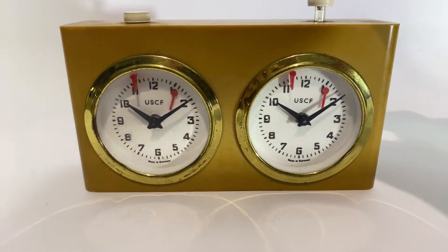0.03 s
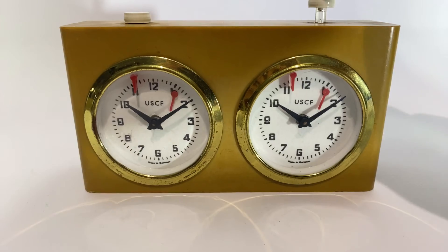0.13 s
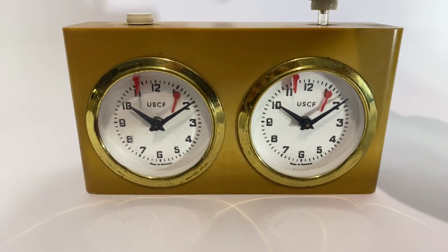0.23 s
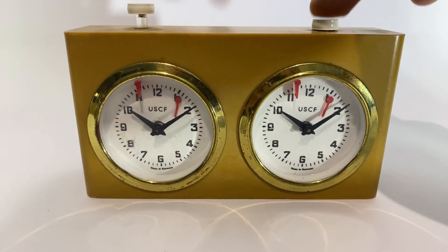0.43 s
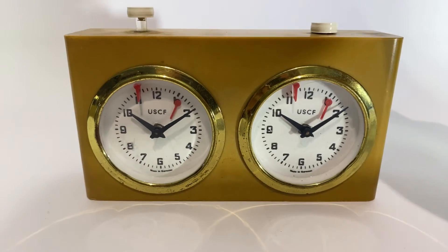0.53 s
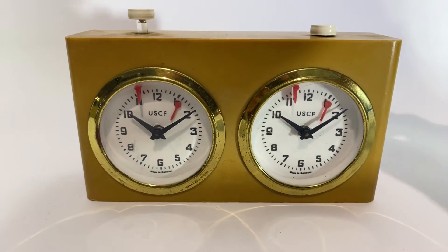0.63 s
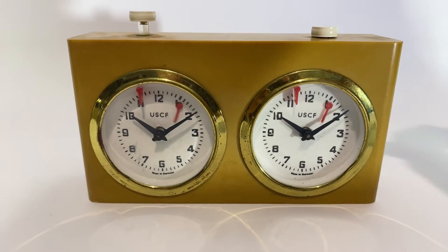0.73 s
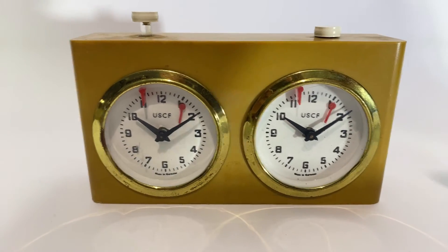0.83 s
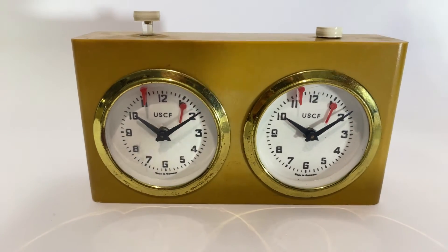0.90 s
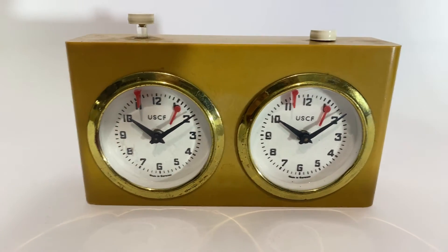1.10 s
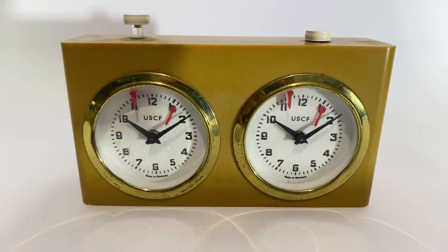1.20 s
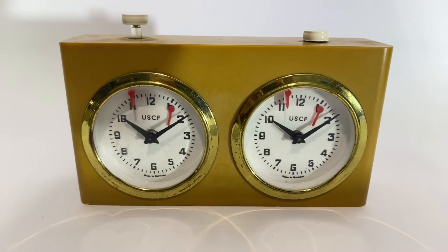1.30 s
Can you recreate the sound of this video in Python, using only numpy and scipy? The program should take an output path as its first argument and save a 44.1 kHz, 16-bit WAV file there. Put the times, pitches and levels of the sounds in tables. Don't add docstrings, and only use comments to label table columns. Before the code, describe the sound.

A sharp plastic-and-metal clack of a chess clock lever, amid faint quick ticking in a quiet room

```python
import sys
import numpy as np
from scipy import signal
from scipy.fft import rfft, irfft
from scipy.io import wavfile
from scipy.ndimage import uniform_filter1d

SR = 44100
rng = np.random.default_rng(int(sys.argv[2]) if len(sys.argv) > 2 else 0)


def put_to_file(sound):
    columns = np.atleast_2d(sound).T
    safe = np.clip(columns, -1, 1)
    whole_steps = np.round(safe * 32767)
    wavfile.write(sys.argv[1], SR, whole_steps.astype(np.int16))


def to_linear_factor(level_db):
    exponent = np.asarray(level_db, float) / 20
    return 10 ** exponent


N = 59535

# pitch_hz [Hz], density_db [dB per Hz]
ROOM_SPECTRUM = [(30, -5.5), (62, 3), (130, -3.5), (700, -13), (1500, -19), (3500, -23.5), (6500, -23.5),
                 (15500, -38)]
# pitch_hz [Hz], level_db [dB], t60_s [s]
HOLLOW_MODES = [(154, -13, 0.061), (210, -2.5, 0.19), (274, -5, 0.063), (286, 1, 0.074), (324, -3.5, 0.35),
                (460, -12, 0.11), (615, -13, 0.061)]
# pitch_hz [Hz], level_db [dB], t60_s [s]
PANEL_MODES = [(785, -5, 0.066), (994.6, -8, 0.13), (1123, -7, 0.11), (1255, -7.5, 0.062),
               (1405, -1.5, 0.077), (1476, 0, .04), (1520, -1.5, 0.042), (1725, 2, 0.031),
               (2035, 0.5, 0.022), (2350, -3, 0.047), (2676, -7, 0.056), (3050, -7, 0.021),
               (3540, -15, 0.065), (3725, -9.5, 0.046)]
# pitch_hz [Hz], level_db [dB], t60_s [s]
METAL_MODES = [(4100, -2, 0.025), (5224, 0, 0.017), (5340, -4, 0.023), (5630, 6, 0.022), (6555, 4.5, 0.027),
               (7050, 8, 0.013), (7630, -1.5, 0.012), (8700, -11, 0.018), (9580, -13, 0.045),
               (10750, -16, 0.025), (11700, -17, 0.012), (12700, -27, 0.015), (14600, -24.5, 0.014)]
# pitch_hz [Hz], level_db [dB], t60_s [s]
WORKS_MODES = [(951, -3, 0.1), (1410, -10, 0.11), (1499, -0.5, 0.12), (1730, -4.5, 0.053),
               (2264, -8.5, 0.083), (2480, -4.5, 0.041), (2673, -4, 0.033), (2967, -7, 0.036),
               (3420, -23.5, 0.042)]
# pitch_hz [Hz], level_db [dB], t60_s [s]
WOOD_MODES = [(554, -8, 0.11), (645, -1, 0.098), (856, -0.5, 0.046), (1160, -1.5, 0.067),
              (1506, -2.5, 0.028), (1580, -7.5, 0.13), (1810, -6, 0.054), (2120, 2, 0.052),
              (2440, -4.5, 0.052), (2790, -8, 0.077), (3078, -12.5, 0.058), (3380, -25, 0.043),
              (6200, -5.5, 0.01)]
# start_s [s], works_db [dB], works_tilt_db [dB per octave],
# metal_db [dB], metal_tilt_db [dB per octave]
TICKS = [(0.061, -64.5, -1.5, -95, .1), (0.0676, -65, 47, -62.5, -6), (0.0685, -75, 8, -86, -5),
         (0.438, -73, 2, -68, .1), (0.461, -59.5, 10, -90, -16), (0.47, -61, -7, -55.5, 15),
         (0.6866, -65.5, 5, -70, 10), (.706, -73, 12, -66, -11), (0.7131, -65, 1, -62.5, 29),
         (0.726, -62, 4, -75, 0), (0.9312, -68, 6, -64, -10), (0.957, -64, 18, -69, -7),
         (0.9622, -55.5, 5, -52.5, 7), (1.179, -66.5, 2.5, -65.5, 16), (1.2045, -62.5, 8.5, -62.5, 26),
         (1.219, -66, 5, -65, -9), (1.2504, -73, 6, -98, 3)]
# start_s [s], level_db [dB], pitch_hz [Hz], t60_s [s]
PINGS = [(0.0666, -64.5, 10750, 0.043), (0.0675, -55, 1487, 0.072), (0.257, -47, 335.2, 0.31),
         (0.213, -42.5, 264, 0.063), (0.2355, -37, 1389, 0.12), (0.2429, -41, 1476, 0.086),
         (0.236, -47, 1725, 0.1), (.214, -51, 3700, 0.13), (.219, -50, 2930, .04), (.6, -57, 837, .05),
         (1.206, -65, 1500, 0.11), (1.206, -67, 4100, 0.055), (0.962, -60, 4100, 0.05),
         (.258, -49, 172.6, 0.28), (.376, -57, 766, 0.038), (.376, -61, 1030, .07),
         (0.382, -55.5, 1486, 0.067), (.386, -62, 1940, 0.045), (.389, -51, 487, 0.069),
         (.398, -55, 550, 0.067), (.408, -58.5, 339.7, 0.34), (0.439, -60.5, 1730, 0.062),
         (0.439, -60.5, 2980, .04), (0.468, -64, 10100, 0.056), (.612, -59.5, 337, 0.3),
         (0.931, -68, 11900, 0.018), (0.9628, -51.5, 1410, 0.07), (1.206, -58, 11700, 0.014)]
# start_s [s], level_db [dB], pitch_hz [Hz], length_s [s]
RUBS = [(0.168, -63, 1110, 0.016), (.171, -59.5, 305, 0.058), (0.182, -62.5, 990, 0.018),
        (0.211, -51.5, 3430, 0.039), (0.21, -71, 14400, .02), (0.228, -70, 14700, 0.018),
        (0.237, -73, 14500, 0.019), (0.231, -61, 6950, 0.025), (0.241, -60, 7200, 0.026),
        (0.352, -65, 980, 0.012), (0.365, -59, 380, 0.029), (0.37, -62.5, 850, 0.014),
        (.379, -58.5, 930, 0.01), (.387, -66.5, 5200, 0.0054), (.390, -60, 487, 0.015),
        (0.264, -60.5, 646, 0.053), (0.597, -68.5, 6200, 0.013)]
# start_s [s], hollow_db [dB], panel_db [dB], metal_db [dB], contact_s [s]
BLOWS = [(0.2125, -45, -47.5, -63, 0.0016), (0.2166, -37, -39, -47.5, 0.0019),
         (.2205, -44, -48.5, -50, 0.0023), (0.2241, -55, -38.5, -56, 0.0035),
         (0.2348, -42.5, -34.5, -42.5, 0.0026), (0.2404, -43, -34.5, -39.5, 0.0017),
         (0.2423, -52, -35, -61, 0.00246), (0.246, -51, -38.5, -56, 0.0035),
         (0.2560, -55, -42, -43.5, 0.0025), (.2590, -50, -46.5, -60, 0.0027),
         (0.2640, -52, -45.5, -54, 0.0015)]
# start_s [s], level_db [dB], pitch_hz [Hz]
BUMPS = [
    (0.214, -42.5, 95),
    (0.247, -37.5, 69.4),
    (0.415, -49.5, 94),
    (0.546, -48, 79.6),
]
# time_s [s], level_db [dB], pitch_hz of the lower band [Hz]
SLIDE_PATH = [
    (0.388, -85, 3803),
    (0.422, -76.5, 3730),
    (0.457, -68, 4100),
    (0.487, -67, 3230),
    (0.552, -73, 3205),
    (0.589, -80, 3300),
]
# pitch_hz [Hz], width_hz [Hz], level_db [dB], centre_s [s], spread_s [s]
SLIDE_BANDS = [
    (5200, 700, 6, 0.43, 0.019),
    (4800, 1700, -5.5, 0.545, 0.1),
    (10200, 2600, -3.5, 0.575, 0.09),
]
# start_s [s], level_db [dB], tilt_db [dB per octave],
# spot_hz, the mode favoured by the struck spot [Hz], hold_s until damped [s]
KNOCKS = [
    (0.5990, -50.5, -1, 2120, 0.015),
    (.6032, -50.5, 0.5, 2440, 0.0087),
    (.6075, -54.5, -3, 645, .008),
    (0.8402, -56.5, -2, 856, 0.0086),
    (.8465, -62.5, -1, 1580, 0.0055),
    (1.0766, -62, -4, 554, 0.014),
    (1.3170, -59.5, -3.5, 1160, 0.011),
]

ROOM_DB, SWELL_DB, FLICKER_DB, CALM_ABOVE_HZ = -64.5, 1.5, 1, 3300
SCATTER_DB, DETUNE, CLUSTER, CLUSTER_DB = 2.5, 0.004, 0.05, -7.5
TICK_CONTACT_S = 0.0074
RUB_WIDTH, RUB_WIDEST_HZ = 0.99, 2420
HOLLOW_LOW_HZ = 153
BUMP_T60_S = 0.045
SLIDE_WIDTH_HZ = 850
KNOCK_LOW_HZ, KNOCK_TOP_HZ = 480, 3770
KNOCK_SPOT_DB, KNOCK_CONTACT_S, KNOCK_DAMP_S = 4, 0.0012, 0.002
ECHO_DB, KNOCK_ROOM_DB = -16, -7
ECHO_T60_S, ECHO_HIGH_T60_S = 0.21, 0.26
ECHO_SPLIT_HZ, ECHO_LOW_HZ, ECHO_EVEN_HZ = 3100, 374, 58.7
MIC_LOW_HZ, TOP_STEP_HZ, TOP_STEP_DB = 58, 15350, -14


def band(x, hz, width_hz):
    b, a = signal.iirpeak(hz, hz / width_hz, fs=SR)
    return signal.lfilter(b, a, signal.lfilter(b, a, x))


def unit(x):
    return x / np.sqrt(np.mean(x ** 2))


def walk(rate):
    hold = int(SR / rate)
    levels = np.repeat(rng.standard_normal(N // hold + 1), hold)
    return 1.2 * uniform_filter1d(levels, hold)[:N]


def add(out, start_s, x):
    i = int(start_s * SR)
    out[i:i + len(x)] += x[:N - i]


def scrape(contact_s):
    t = np.arange(1024) / SR
    decay = np.exp(-t / max(contact_s, 2e-4) * 2)
    return rng.standard_normal(len(t)) * decay * np.clip(t / 0.0003, 0, 1)


def ring(modes, push, tilt_db=0.):
    hz, db, t60 = np.tile(np.array(modes, float), (3, 1)).T[:, :, None]
    main = (np.arange(len(hz)) < len(modes))[:, None]
    chance = rng.standard_normal((2, len(hz), 1))
    hz = np.minimum(hz * (1 + np.where(main, DETUNE, CLUSTER) * chance[1]), SR * 0.45)
    t = np.arange(int(min(t60.max() + 0.025, 0.25) * SR)) / SR
    reach = np.abs(np.exp(2j * np.pi * hz * t[:len(push)]) @ push)[:, None]
    level_db = db + np.where(main, 0, CLUSTER_DB) + SCATTER_DB * chance[0]
    gain = to_linear_factor(level_db + tilt_db * np.log2(hz / 1000))
    gain = gain / (reach + 0.39 * np.sqrt(np.sum(push ** 2)))
    envelope = np.exp(-np.log(1000) * t / t60) * (1 - np.exp(-t * hz * 2))
    wave = gain * np.sin(2 * np.pi * hz * t) * envelope
    out = signal.fftconvolve(wave.sum(axis=0), push)
    return out / np.abs(out).max()


def room_tone():
    f = np.fft.rfftfreq(N, 1 / SR) + 1
    swell = walk(2.5)
    hz, density_db = np.array(ROOM_SPECTRUM).T
    white = rfft(rng.standard_normal(N)) * to_linear_factor(np.interp(np.log(f), np.log(hz), density_db))
    out = np.zeros(N)
    for octave in np.arange(4, 15):
        share = np.clip(1 - np.abs(np.log2(f) - octave), 0, 1)
        calm = min(1, CALM_ABOVE_HZ / 2. ** octave) ** 0.5
        motion_db = (SWELL_DB * swell + FLICKER_DB * walk(11.63)) * calm
        out = out + irfft(white * share, N) * to_linear_factor(motion_db)
    return to_linear_factor(ROOM_DB) * unit(out)


def escapement():
    out = np.zeros(N)
    for start_s, works_db, works_tilt_db, metal_db, metal_tilt_db in TICKS:
        push = scrape(TICK_CONTACT_S)
        add(out, start_s, to_linear_factor(works_db + 10.5) * ring(WORKS_MODES, push, works_tilt_db))
        add(out, start_s, to_linear_factor(metal_db + 6.5) * ring(METAL_MODES, push, metal_tilt_db))
    return out


def pings():
    out, t = np.zeros(N), np.arange(SR // 4) / SR
    for start_s, level_db, hz, t60 in PINGS:
        decay = to_linear_factor(level_db - 60 * t / t60)
        add(out, start_s, decay * np.sin(2 * np.pi * hz * t) * np.clip(t / 0.00036, 0, 1))
    return out


def rubs():
    out, t = np.zeros(N), np.arange(4096) / SR
    for start_s, level_db, hz, length_s in RUBS:
        shape = t / length_s * np.exp(1 - 3 * t / length_s) * 3
        width_hz = min(RUB_WIDTH * hz, RUB_WIDEST_HZ)
        noise = unit(band(rng.standard_normal(len(t)), hz, width_hz))
        add(out, start_s, to_linear_factor(level_db) * shape * noise)
    return out


def lever():
    out = np.zeros(N)
    for start_s, hollow_db, panel_db, metal_db, contact_s in BLOWS:
        push = scrape(contact_s)
        for modes, db in ((HOLLOW_MODES, hollow_db), (PANEL_MODES, panel_db), (METAL_MODES, metal_db)):
            add(out, start_s, to_linear_factor(db + 6.5) * ring(modes, push))
    return signal.sosfilt(signal.butter(3, HOLLOW_LOW_HZ, "high", fs=SR, output="sos"), out)


def table_bumps():
    out, t = np.zeros(N), np.arange(SR // 5) / SR
    for start_s, level_db, hz in BUMPS:
        decay = np.exp(-np.log(1000) * t / BUMP_T60_S)
        add(out, start_s, to_linear_factor(level_db) * np.sin(2 * np.pi * hz * t) * decay)
    return out


def finger_slide():
    t = np.arange(N) / SR
    time_s, level_db, hz = np.array(SLIDE_PATH).T
    phase = 2 * np.pi * np.cumsum(np.interp(t, time_s, hz)) / SR
    lowpass = signal.butter(2, SLIDE_WIDTH_HZ / 2, fs=SR)
    a, b = signal.lfilter(*lowpass, rng.standard_normal((2, N)))
    hiss = unit(a * np.cos(phase) + b * np.sin(phase))
    for band_hz, width_hz, band_db, centre_s, spread_s in SLIDE_BANDS:
        swell = np.exp(-((t - centre_s) / spread_s) ** 2)
        hiss = hiss + to_linear_factor(band_db) * swell * unit(band(rng.standard_normal(N), band_hz, width_hz))
    return hiss * to_linear_factor(np.interp(t, time_s, level_db, -120, -120) + 0.93 * walk(60.3))


def knocks():
    out = np.zeros(N)
    for start_s, level_db, tilt_db, spot_hz, hold_s in KNOCKS:
        modes = []
        for hz, mode_db, t60 in WOOD_MODES:
            favour_db = KNOCK_SPOT_DB * np.exp(-(np.log(hz / spot_hz) / 0.05) ** 2)
            modes.append((hz, mode_db + favour_db, t60))
        wood = ring(modes, scrape(KNOCK_CONTACT_S), tilt_db)
        late = np.maximum(np.arange(len(wood)) / SR - hold_s, 0)
        add(out, start_s, to_linear_factor(level_db + 11.0) * wood * np.exp(-late / KNOCK_DAMP_S))
    sos = signal.butter(3, [KNOCK_LOW_HZ, KNOCK_TOP_HZ], "band", fs=SR, output="sos")
    return signal.sosfilt(sos, out)


def echo(x):
    t, noise = np.arange(SR // 2) / SR, rng.standard_normal(SR // 2)
    low = signal.lfilter(*signal.butter(1, ECHO_SPLIT_HZ, fs=SR), noise)
    tail = low * to_linear_factor(-60 * t / ECHO_T60_S) + (noise - low) * to_linear_factor(-60 * t / ECHO_HIGH_T60_S)
    tail = signal.lfilter(*signal.butter(2, ECHO_LOW_HZ, "high", fs=SR), tail)
    spectrum = rfft(tail * np.clip(t / 0.0056, 0, 1))
    power, bins = np.abs(spectrum) ** 2 + 1e-12, int(ECHO_EVEN_HZ / 2) + 1
    even = np.sqrt(uniform_filter1d(power, 10 * bins) / uniform_filter1d(power, bins))
    tail = irfft(spectrum * even)
    tail = tail * np.clip(t / 0.003, 0, 1) * np.clip(2 - 8 * t, 0, 1)
    return signal.fftconvolve(x, tail / np.sqrt(np.sum(tail ** 2)))[:N]


def scene():
    clock = escapement() + pings() + rubs() + lever()
    far = knocks()
    wet = echo(to_linear_factor(ECHO_DB) * clock + to_linear_factor(KNOCK_ROOM_DB) * far)
    return (room_tone() + clock + table_bumps() + finger_slide() + far + wet)[None]


def top_cut(x):
    return signal.sosfilt(signal.butter(12, 15700, fs=SR, output="sos"), x)


def record(dry):
    dry = signal.sosfilt(signal.butter(3, MIC_LOW_HZ, "high", fs=SR, output="sos"), dry)
    top = np.where(np.fft.rfftfreq(N, 1 / SR) > TOP_STEP_HZ, to_linear_factor(TOP_STEP_DB), 1)
    mix = irfft(rfft(dry) * top, N)
    return top_cut(mix)


dry = scene()
out = record(dry)
put_to_file(out)
```